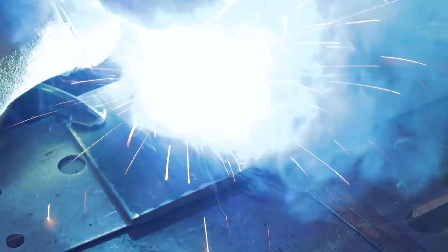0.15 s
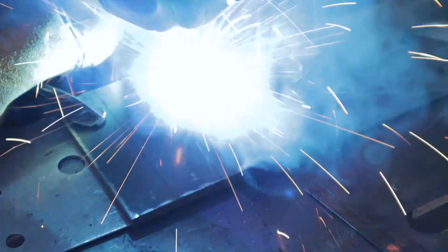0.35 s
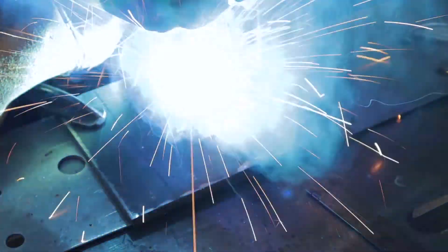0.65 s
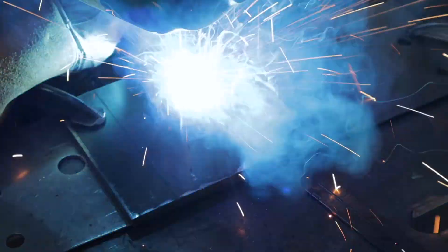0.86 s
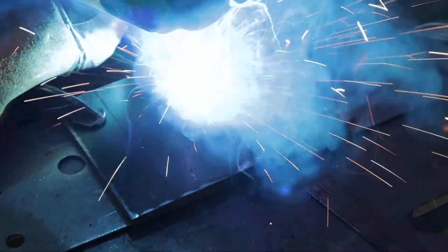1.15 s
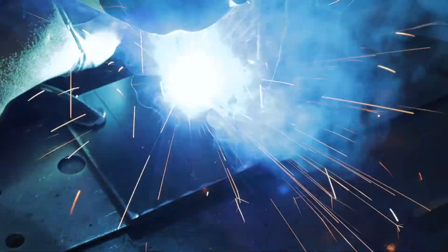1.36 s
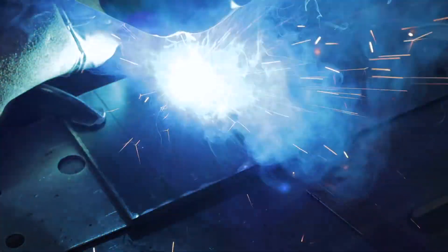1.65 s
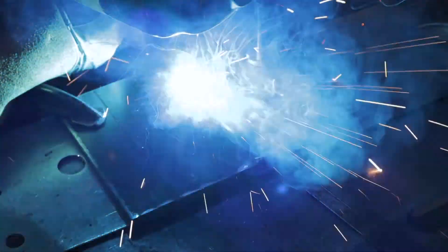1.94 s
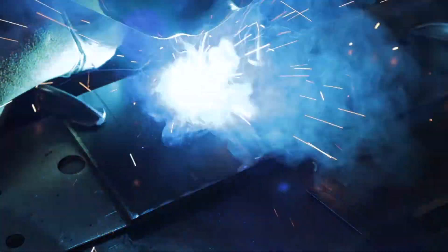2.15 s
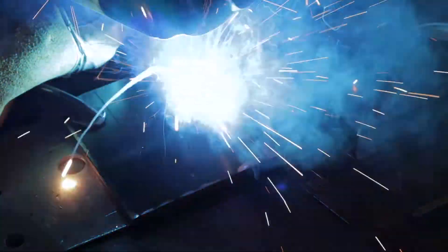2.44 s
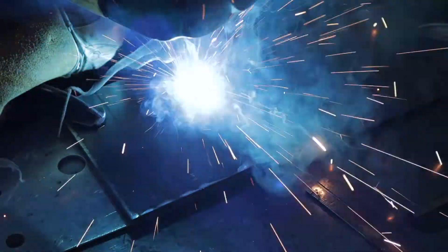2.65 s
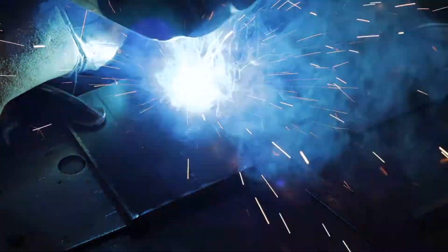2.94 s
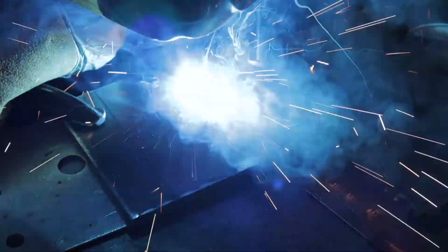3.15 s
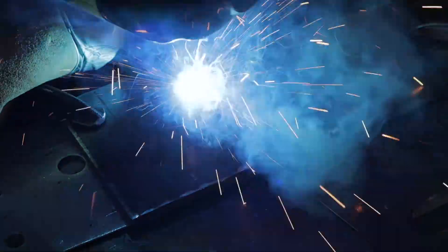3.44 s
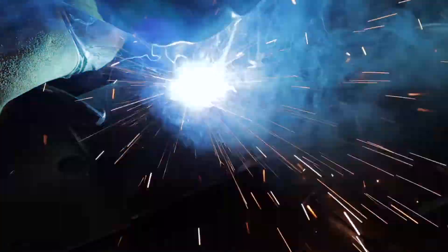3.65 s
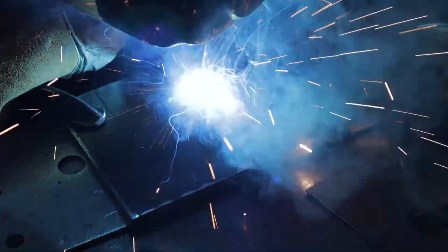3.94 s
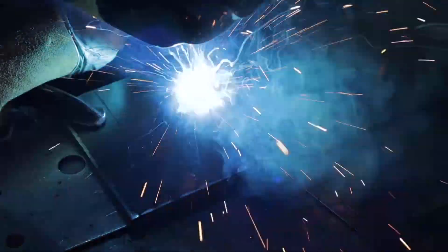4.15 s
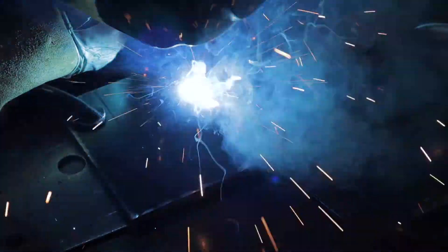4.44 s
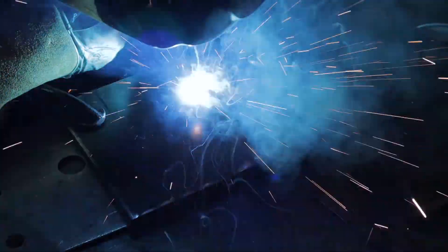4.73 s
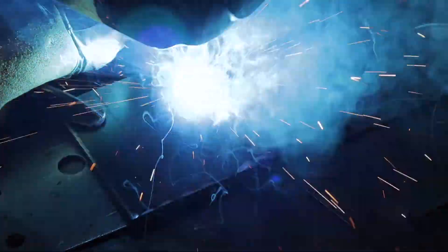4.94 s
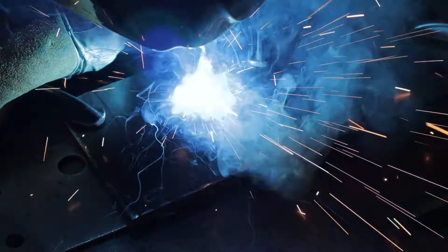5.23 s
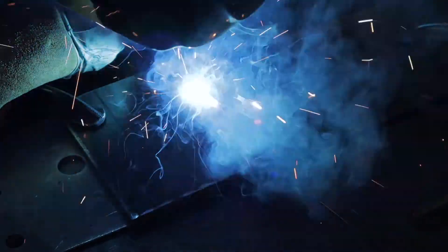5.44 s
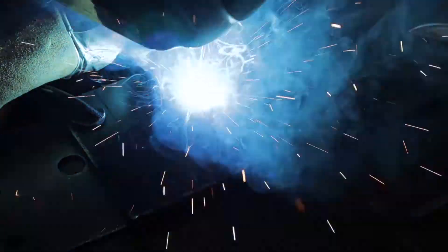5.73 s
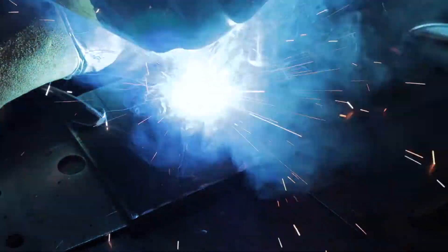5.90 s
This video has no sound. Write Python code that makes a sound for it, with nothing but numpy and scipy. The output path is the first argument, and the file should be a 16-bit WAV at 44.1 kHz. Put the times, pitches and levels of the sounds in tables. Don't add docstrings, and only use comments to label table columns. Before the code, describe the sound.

A wire-fed welding arc works on steel, heard very close and dry in wide stereo. From 0 to 0.9 seconds, dull, gritty pops come in quick irregular clusters, strong ones mixed with weak, shifting left and right; small snaps fill gaps over a low, fluttering hiss and faint droplet patter. From 1 to 1.6 the pops are sparser and softer. At 1.65 to 2.1 they crowd together loudly, then continue in uneven groups, with the hiss gaining a brighter metallic sheen. Between 3 and 4.2 stronger, isolated thumps punctuate it, and the sizzle repeatedly drops out for instants. From 4.4 to 5 comes the densest, loudest crackling, with a near-silent gap in the hiss about 4.7. After 5.2 pops thin to a few; the hiss swells, steady and bright, with a last pop at 5.9 and sharp spits around 6, still burning at the end.

```python
import sys
import numpy as np
from scipy import signal
from scipy.fft import rfft, irfft
from scipy.io import wavfile
from scipy.ndimage import uniform_filter1d

SR = 44100
rng = np.random.default_rng(int(sys.argv[2]) if len(sys.argv) > 2 else 0)


def voltage_ratio(decibels):
    exponent = np.asarray(decibels, float) / 20
    return 10 ** exponent


def persist_wave(psi):
    counts = np.round(np.clip(psi, -1, 1) * 32767).astype(np.int16)
    wavfile.write(sys.argv[1], SR, np.atleast_2d(counts).T)


N = 267687


def evened(x):
    return x / np.sqrt(np.mean(x ** 2) + 1e-20)


def add(mix, start_s, sound):
    part = mix[max(round(start_s * SR), 0):][:len(sound)]
    part += sound[:len(part)]


def low_cut(x, hz, q):
    w = 2 * np.pi * hz / SR
    return signal.lfilter([1, -2, 1], [1 + w / 2 / q, -2 * np.cos(w), 1 - w / 2 / q], x)


def smooth(x, hz):
    return signal.sosfilt(signal.butter(N=4, Wn=hz, fs=SR, output="sos"), x)


def resonate(x, hz, width_hz):
    turn = np.exp(2j * np.pi * hz * np.arange(x.shape[-1]) / SR)
    r = np.exp(-np.pi * width_hz / SR)
    return 2 * (turn * signal.lfilter([1 - r], [1, -r], x / turn)).real


def swell(samples, peak_s):
    u = np.arange(samples) / SR / peak_s
    return u * np.exp(1 - u)


def blast(ms):
    u = np.arange(1200) / SR / (max(ms, .2) / 1000)
    wave = u * (1 - 2.32 * u) * np.exp(-u)
    wave = low_cut(low_cut(wave, hz=669, q=0.51), hz=90, q=0.79)
    wave = wave + 0.64 * resonate(wave, hz=2170, width_hz=350)
    wave = smooth(wave, hz=2870)
    return wave / abs(wave).max()


# start in seconds, peak level in dB, left-right difference in dB,
# likeness of the two capsules from -1 to 1.
SHORT_CIRCUITS = [(0.0206, -18.5, 6, -1), (0.044, -15.5, 0, 0.48), (0.0798, -21, 2, 0.4),
                  (0.0839, -9, -3, 0.7), (0.1076, -13, 7, -0.6), (0.1118, -6, 3, 0.33),
                  (0.117, -16, -3, -0.65), (0.127, -19, 8, 0.49), (0.1302, -13.5, 4, 1),
                  (0.1448, -10, -11, 0.21), (0.1678, -22, 0, 0.39), (0.226, -20, -6, -0.93),
                  (0.2647, -11.5, 2.5, 0.86), (0.281, -19, -9, 0.12), (0.3087, -10, 8, 0.87),
                  (0.3148, -14, -4, 0.079), (0.3245, -8.5, -3, 0.18), (0.355, -11.5, 0, 0.99),
                  (0.3614, -14, -6, -0.15), (0.448, -12, 2, 0.43), (0.4556, -6, -1.5, 0.33),
                  (0.562, -15, 2, -0.45), (0.586, -15.5, 5, 0.22), (0.5897, -18.5, 7, 0.4),
                  (0.5979, -18, 12, -0.39), (0.6643, -14, 8, 0.8), (0.6688, -18.5, 0, 0.12),
                  (0.705, -20.5, 11, 0.11), (0.8377, -13.5, 4, 0.85), (0.8674, -20, 5, -0.13),
                  (0.8797, -9, 0.5, 1.0), (0.9079, -9.5, -1, 0.74), (1.05, -20.5, 8, 0.5),
                  (1.0725, -10, 1, 1), (1.1307, -17.5, -7, -0.6), (1.1421, -15.5, -6, -0.5),
                  (1.2662, -13.5, 6, -0.49), (1.3826, -13, 3.5, -0.5), (1.4855, -13, -4, -0.99),
                  (1.52, -12.5, 4.5, 0.26), (1.5727, -16.5, 7, 0.25), (1.626, -12.5, 6, 0.63),
                  (1.6392, -17, 10, 0.5), (1.6673, -7.5, -0.5, 1), (1.6705, -14, -0.5, 0.58),
                  (1.6883, -12, -2, 0.93), (1.7235, -9, -4, 0.38), (1.7315, -7, -2, 0.5),
                  (1.766, -10, 1, 0.57), (1.7696, -6.5, 0, 1), (1.7927, -10.5, -7, 0.3),
                  (1.8205, -6, 5, 0.2), (1.833, -16, -6, -0.68), (1.8544, -10.5, -2, 0.88),
                  (1.8769, -22, -8, 0.75), (1.9169, -16, 0, 0.84), (1.9205, -17, -1, 0.9),
                  (1.9683, -9, 1, 0.77), (1.972, -18, 4, -0.39), (1.987, -18.5, -12, 0.9),
                  (1.991, -15, 2.5, 0.11), (2.0068, -11, -1, 0.54), (2.0096, -17, 6, 0.1),
                  (2.0283, -17, -1, -0.087), (2.0825, -9.5, -1, 0.73), (2.25, -6, 7.5, 0.27),
                  (2.2553, -16, 0, 0.12), (2.2657, -20, 8, 0.4), (2.273, -18.5, 10, -0.5),
                  (2.3211, -10, 5.5, 0.85), (2.3256, -16, 0, 0.73), (2.394, -12, -1, 0.94),
                  (2.41, -11, 2, 0.57), (2.4137, -7, 3, 0.84), (2.4403, -18.5, 6, 0.12),
                  (2.6077, -8, -1, -0.39), (2.658, -14, 0, 0.9), (2.6672, -14, -7, 0.68),
                  (2.6823, -8, 7.5, 0.34), (2.912, -9.5, 6, 0.8), (2.9211, -15, -4, -0.4),
                  (2.9467, -13, -1, 0.8), (2.9512, -14, 0, 0.89), (3.0352, -11.5, -0.5, 0.53),
                  (3.0686, -5.5, 5, 0.093), (3.1048, -11, 3, 0.88), (3.1088, -12, -2, 0.0),
                  (3.1808, -13.5, 4, -0.25), (3.2413, -16, -2, 0.92), (3.2791, -16, 3.5, 1),
                  (3.358, -5, -5, -0.67), (3.432, -15, 1, -0.19), (3.4801, -19.5, 6, -0.1),
                  (3.5995, -5.5, 1, 0.33), (3.6798, -9.5, 4, 0.96), (3.683, -22, 4, 0.6),
                  (3.709, -5.5, 0, 0.9), (3.7591, -9.5, 0.5, 0.81), (3.8013, -4, 5.5, 0.25),
                  (3.815, -14, 2, -0.65), (3.922, -19.5, -4, 1), (3.9301, -8, 5, -0.47),
                  (3.9352, -10, -1, -0.48), (3.9826, -14, -4, 0.68), (4.067, -10.5, 1, 0.88),
                  (4.0729, -5.5, 6, -0.62), (4.082, -15, -6, -0.61), (4.1115, -5.5, 0, -0.015),
                  (4.127, -15, 6, 0.59), (4.1759, -19, 6, -0.47), (4.215, -12, -1.5, 0.9),
                  (4.3206, -11.5, -2, -0.55), (4.3232, -11, 5, 0.093), (4.3588, -16, 0, -0.7),
                  (4.3823, -16, 0, -0.48), (4.4005, -15, 7, 0.33), (4.4467, -16, 4, 0.7),
                  (4.458, -10, 0, 0.75), (4.4748, -12.5, 2, 0.7), (4.56, -9, 7, -0.11),
                  (4.5632, -10, -6, 1), (4.6045, -5, -1.5, -0.081), (4.6141, -16, 2, -0.2),
                  (4.634, -11.5, 1.5, 0.88), (4.6399, -8.5, 3, -0.58), (4.65, -15, -4, -0.61),
                  (4.6836, -11, 0.5, 0.94), (4.7227, -14, 7, -0.4), (4.726, -7.5, 6.5, -0.73),
                  (4.7577, -14, 1, -0.1), (4.7612, -12, -4, -0.5), (4.7761, -10.5, 5, 0.8),
                  (4.7812, -5.5, 2, -0.14), (4.7892, -11, 0, 0.78), (4.7987, -17, -5, -0.5),
                  (4.803, -19, -1, -0.5), (4.8069, -5, 0, 0.4), (4.8113, -8.5, 1, 0.79),
                  (4.8457, -15.5, 7, -0.014), (4.891, -17.5, 3.5, 0.7), (4.9024, -17, 8, 0.062),
                  (4.9359, -11, 0, -0.5), (4.9414, -14, 7, -0.2), (4.9492, -6.5, 5, -0.46),
                  (4.96, -9.5, -2, 0.9), (4.9757, -16, 0, 0.64), (5.0033, -9.5, -1, -0.16),
                  (5.0976, -10.5, -2, 0.44), (5.1014, -10, -0.5, -0.29), (5.134, -11.5, -1, 0.2),
                  (5.1789, -10, -0.5, 0.0), (5.2557, -12.5, 0, 0.41), (5.3337, -13.5, -1, 0.93),
                  (5.4615, -13.5, -0.5, 0.7), (5.4667, -15.5, 3, 1.0), (5.5144, -13, -0.5, 0.65),
                  (5.5377, -17, 2, 0.99), (5.888, -14, -5, -0.057)]
# start in seconds, peak level in dB,
# left-right difference in dB.
WIRE_SNAPS = [(0.0061, -21.5, 5), (0.049, -16.5, -2), (0.187, -18, 0), (0.2037, -24, -1), (0.3691, -23, 7),
              (0.3847, -27.5, 6), (0.6197, -20, 6), (0.7261, -22, 1), (0.76, -19.5, 5.5), (0.858, -23, 9),
              (0.914, -21, -2), (0.9347, -18.5, -9), (0.9422, -18.5, 5), (0.9658, -24.5, 3),
              (1.0629, -22, 5), (1.0834, -20, -3), (1.1069, -20, 5), (1.1509, -19.5, 1), (1.2886, -22, 8),
              (1.645, -26, 9), (1.747, -21, -2), (1.757, -18, 7), (1.8637, -23, 4), (1.9342, -21, -3),
              (2.0952, -24, -1), (2.103, -22.5, 5), (2.1395, -26, 6), (2.1891, -25, 3), (2.207, -19.5, -6),
              (2.285, -25, 7), (2.2894, -23, 4), (2.3146, -23, 8), (2.3335, -17, 6), (2.357, -26, -1),
              (2.3606, -32, 1), (2.364, -26, 5), (2.3723, -21, 10), (2.4364, -19, 4), (2.4481, -26, 6),
              (2.691, -19, -4), (2.7847, -22.5, -1), (2.9314, -17, 4), (2.935, -17, 7), (2.9424, -22, 0),
              (2.9742, -20.5, -3), (3.0443, -17.5, 2), (3.134, -17.5, 5), (3.199, -22.5, 8),
              (3.2024, -20, 8), (3.3543, -25.5, -18), (3.5626, -24, 1), (3.5867, -20.5, 11),
              (3.627, -16, 0), (3.65, -18, 3), (3.7256, -20, 6), (3.7288, -22, 5), (3.8196, -17, 5),
              (3.8411, -17.5, 3), (3.8708, -19.5, 0), (4.132, -18, 4), (4.2463, -23.5, 3),
              (4.4139, -20.5, 0), (4.423, -15, 0), (4.5294, -23.5, 3), (4.736, -22, 3), (4.8206, -25, 7),
              (4.8297, -24, -2), (4.8384, -26, 4), (4.8609, -21, 2), (4.8646, -27, 7), (4.9819, -14, -1),
              (4.9857, -24, 5), (5.031, -22.5, 0), (5.2984, -18, 3), (5.546, -20, 1), (5.8145, -17, -5)]


def bursts():
    snaps = [(*row, .4) for row in WIRE_SNAPS]
    rows = list(SHORT_CIRCUITS) + snaps
    chance = rng.random((len(rows), 4))
    out, fizz = np.zeros((2, N)), np.zeros((2, N))
    fizz_swell = swell(1200, peak_s=0.0013)
    for (start_s, db, pan_db, like), (size, other, lag, flip) in zip(rows, chance):
        near, like = int(pan_db < 0), np.clip(like, -1, 1)
        wave = blast(ms=0.67 + 0.97 * size)
        bass = signal.lfilter([.018], [1, -.982], wave)
        late = np.roll(blast(ms=0.39 + .5 * other), round(SR * .0012 * lag))
        swirl = low_cut(late, hz=202, q=.7) * np.sign(flip - .5)
        far_wave = bass + like * (wave - bass) + np.sqrt(1 - like ** 2) * swirl
        for ear, sound in ((near, wave), (1 - near, far_wave)):
            gain = voltage_ratio(db + 1.0 + (.5 - ear) * pan_db)
            add(out[ear], start_s - .0007, gain * sound)
            add(fizz[ear], start_s - .0006, gain * fizz_swell)
    grit = smooth(low_cut(rng.standard_normal((2, N)), hz=300, q=0.95), hz=2490)
    return out + voltage_ratio(-17.0) * fizz * evened(grit)


# start in seconds, end in seconds, depth in dB.
ARC_FALTERS = [(2.212, 2.254, -6.5), (2.547, 2.568, -6.5), (2.579, 2.603, -7), (3.114, 3.129, -5),
               (3.139, 3.159, -7), (3.205, 3.239, -7), (3.29, 3.316, -9), (3.331, 3.352, -6),
               (3.371, 3.394, -3), (3.572, 3.584, -9), (3.77, 3.794, -6), (3.847, 3.864, -7.5),
               (3.994, 4.02, -6.5), (4.331, 4.356, -9.5), (4.475, 4.517, -1), (4.573, 4.595, -5),
               (4.641, 4.674, -17), (4.683, 4.722, -33), (4.79, 4.81, -12.5), (5.062, 5.082, -6.5),
               (5.143, 5.178, -6), (5.224, 5.25, -7.5), (5.95, 5.971, -6), (5.986, 6.009, -7)]


def falters():
    t = np.arange(N) / SR
    dips_db = sum(1.19 * db * ((t > start_s) & (t < end_s)) for start_s, end_s, db in ARC_FALTERS)
    return voltage_ratio(uniform_filter1d(dips_db, size=150))


# time in seconds, sizzle in dB, its top sheen in dB above that,
# droplet patter in dB.
ARC_COURSE = [(0, -41.5, -17, -34), (.25, -44.5, -10, -37.5), (.6, -44, -14, -37), (1.05, -44.5, -12, -38),
              (1.25, -41.5, -11, -57), (1.45, -40, -11, -44), (1.65, -42.5, -18, -33.5),
              (1.85, -45.5, 5, -34), (2.2, -44, -5, -31), (2.55, -45, 0, -44.5), (2.75, -39.5, 4, -44),
              (3.0, -41.5, 2.5, -34), (3.25, -44, -5, -41.5), (3.5, -40, 4.5, -45.5),
              (3.75, -41.5, 0, -35.5), (4.0, -44, -5, -36.5), (4.3, -43, 4.5, -39.5),
              (4.6, -47.5, 3, -34.5), (4.71, -39, -3, -28), (4.73, -34, -4, -34), (4.95, -36.5, 2, -34),
              (5.15, -39, -1, -39), (5.4, -35, 0.5, -44), (5.7, -33.5, -1, -50), (5.9, -33, 2, -38.5),
              (6.07, -35, 0, -44)]
# start in seconds, peak level in dB.
METAL_SPITS = [(0.006, -31), (0.455, -43), (0.774, -29), (0.793, -32.5), (1.22, -29.5), (1.384, -27),
               (1.626, -33), (1.646, -28), (1.669, -28), (1.69, -29), (1.731, -27), (1.769, -32),
               (1.989, -35), (2.142, -27), (2.326, -32), (2.413, -37), (2.574, -31), (2.609, -26),
               (2.986, -34), (3.183, -29), (3.259, -32.5), (3.281, -29), (3.356, -25), (3.431, -23.5),
               (3.601, -29), (3.681, -48), (3.728, -29), (3.759, -29), (3.892, -28), (3.914, -31),
               (3.986, -34), (4.038, -48), (4.325, -32), (4.425, -25), (4.537, -35), (4.562, -37),
               (4.607, -31), (5.101, -26)]
# start in seconds, peak level in dB.
LATE_SPITS = [
    (5.134, -29),
    (5.18, -37),
    (5.219, -29),
    (5.256, -26),
    (5.98, -25),
    (6.016, -23.5),
    (6.06, -26),
]


def strength():
    course_s, *columns = np.transpose(ARC_COURSE)
    t = np.arange(N) / SR
    sizzle_db, sheen_db, patter_db = (np.interp(t, course_s, column) for column in columns)
    level = voltage_ratio(sizzle_db)
    flare = swell(900, peak_s=0.0026)
    for start_s, db in list(METAL_SPITS) + list(LATE_SPITS):
        add(level, start_s - .003, voltage_ratio(db - 7.5) * flare)
    for start_s, db, *_ in SHORT_CIRCUITS:
        add(level, start_s - .002, voltage_ratio(db - 39.5) * flare)
    dips = falters()
    return level * dips, voltage_ratio(sheen_db), voltage_ratio(patter_db) * dips


# frequency in Hz, level in dB per Hz.
ARC_COLOUR = [(60, -38), (150, -4), (1200, -2.5), (1900, 0.5), (3000, -3), (6000, -5.5), (12400, -4),
              (13300, -17), (14600, -20), (15700, -58)]
# delay in ms, left share, right share.
PLATE_ECHOES = [(0.231, 0.22, 0.095), (0.772, 0.28, -0.012), (1.541, 0.27, -0.06), (1.629, -0.26, 0.31)]
# frequency in Hz, width in Hz, left level in dB, right level in dB.
STEEL_SHEEN = [(5450, 530, -10, -9.5), (3710, 380, -13.5, -10), (13300, 230, -19, -8), (11430, 350, -12, 4)]


def sizzle(level, sheen):
    sparks_per_s, spark_decay_s = 200, 0.00076
    sparks = voltage_ratio(2.5 * np.minimum(rng.exponential(1, N), 3.5)) * (rng.random(N) < sparks_per_s / SR)
    spark_tail = np.exp(-np.arange(300) / SR / spark_decay_s)
    chop = 0.76 + 0.71 * evened(signal.oaconvolve(sparks, spark_tail)[:N])
    flutter = evened(uniform_filter1d(uniform_filter1d(rng.standard_normal(N), size=700), size=400))
    own = rng.standard_normal((3, N))
    hiss = (1.04 * own[:2] + own[2]) * chop * voltage_ratio(1.22 * flutter)

    hz = np.fft.rfftfreq(N, 1 / SR)
    colour_hz, colour_db = np.transpose(ARC_COLOUR)
    spectrum = rfft(hiss) * voltage_ratio(np.interp(np.log(hz + 1), np.log(colour_hz), colour_db))
    for ms, left, right in PLATE_ECHOES:
        spectrum = spectrum * (1 + np.array([[left], [right]]) * np.exp(-2j * np.pi * hz * ms / 1000))
    spectrum[1] *= np.exp(2j * np.pi * hz * 0.0007605)
    hiss = irfft(spectrum, N)

    for ring_hz, width_hz, left_db, right_db in STEEL_SHEEN:
        gain = 2 * voltage_ratio(np.array([[left_db], [right_db]]))
        ring = gain * resonate(hiss, ring_hz, width_hz)
        hiss = hiss + ring * (sheen if ring_hz > 8000 else 1)
    return voltage_ratio(3.5) * evened(hiss) * level


def patter(level):
    drops_per_s = 55
    size = voltage_ratio(4.6 * np.minimum(rng.exponential(1, (2, N)), 2.8))
    hits = size * (rng.random((2, N)) < drops_per_s / SR) * rng.choice([-1., 1.], (2, N))
    drops = signal.oaconvolve(hits, blast(ms=1.17)[None], axes=1)[:, :N]
    return voltage_ratio(1.5) * evened(drops + 0.23 * drops[::-1]) * level


def scene():
    sizzle_level, sheen, patter_level = strength()
    return bursts() + sizzle(sizzle_level, sheen) + patter(patter_level)


def band_limit(x):
    return signal.sosfilt(signal.butter(12, 16400, fs=SR, output="sos"), x)


def record(dry):
    mix = np.tanh(dry * 0.86) / 0.99
    return band_limit(mix)


dry = scene()
out = record(dry)
persist_wave(out)
```